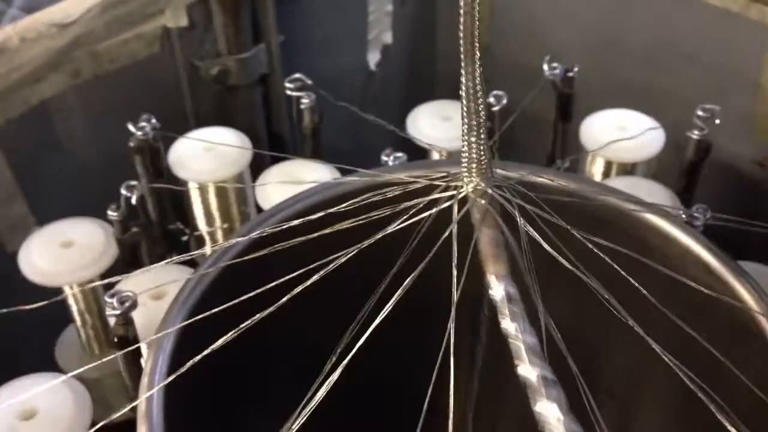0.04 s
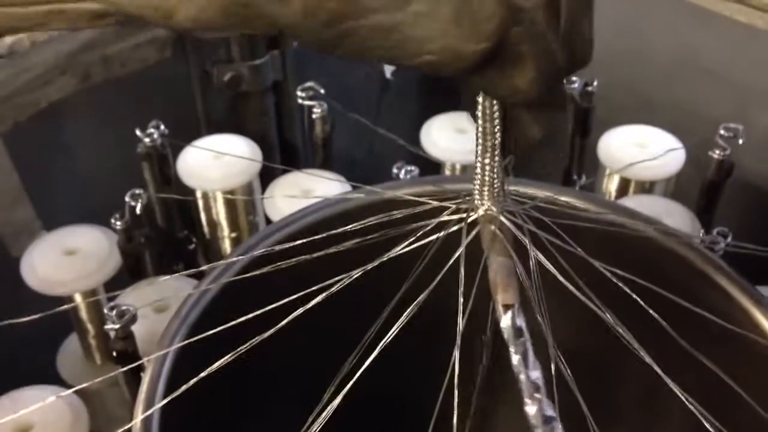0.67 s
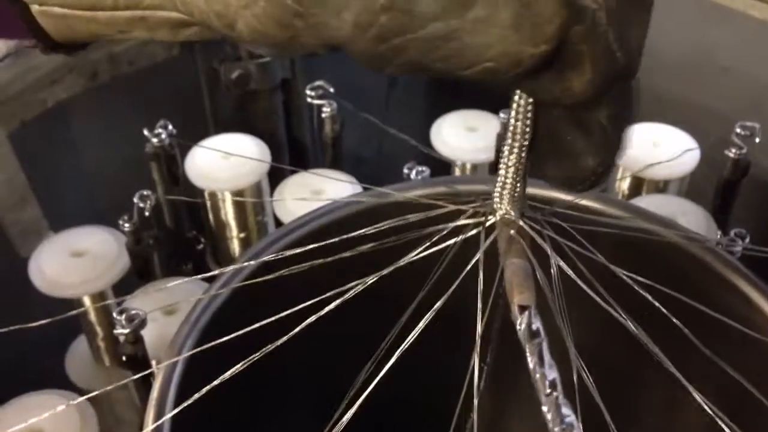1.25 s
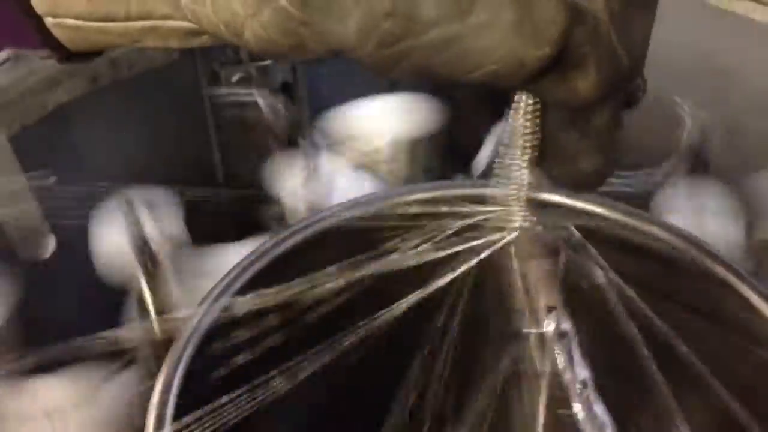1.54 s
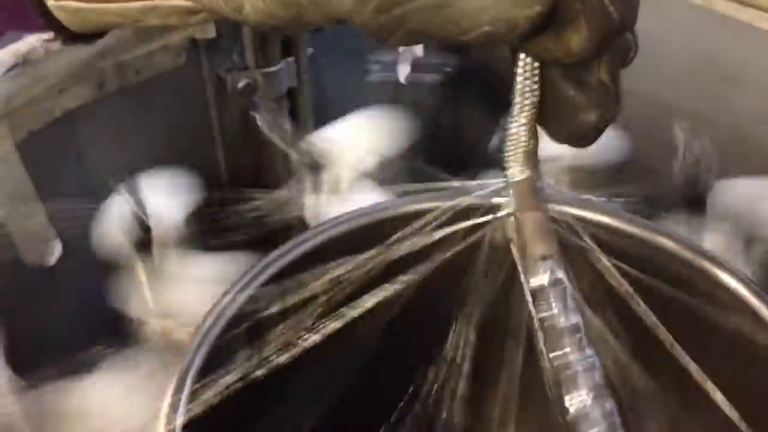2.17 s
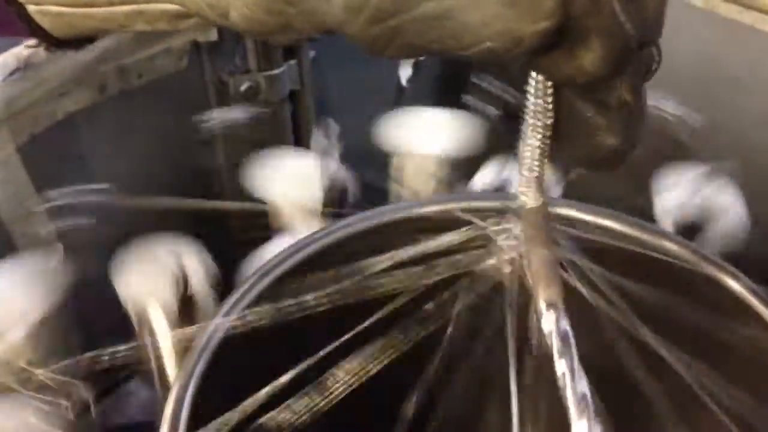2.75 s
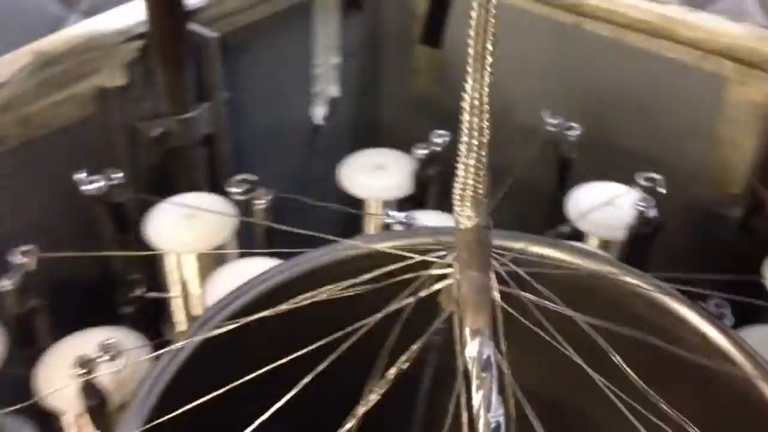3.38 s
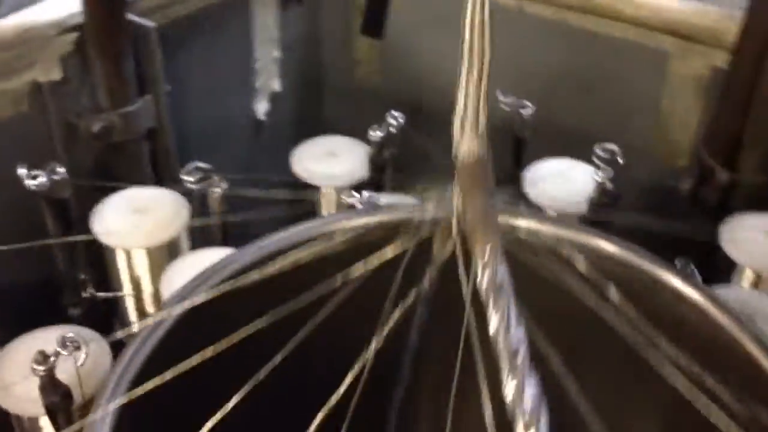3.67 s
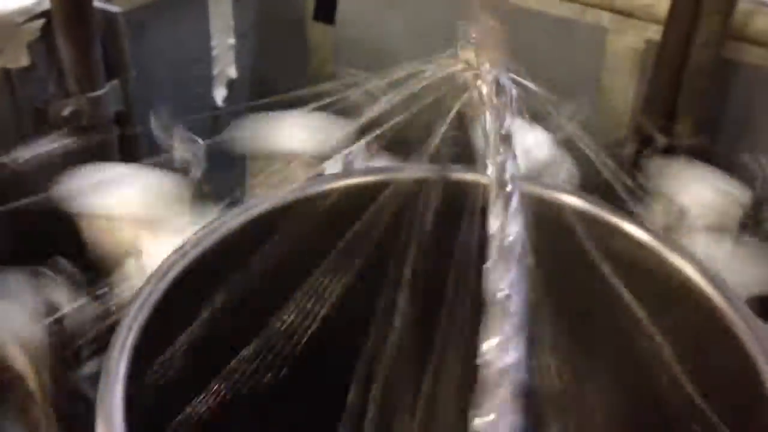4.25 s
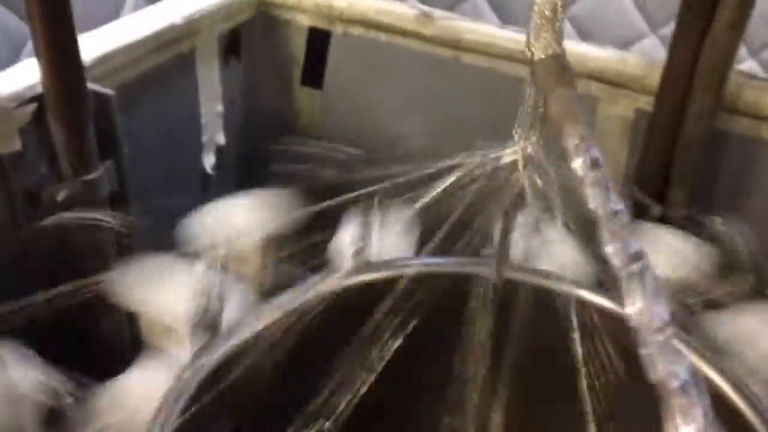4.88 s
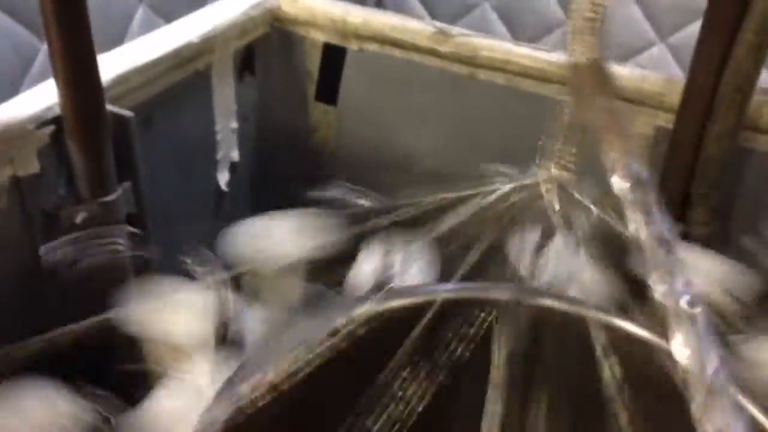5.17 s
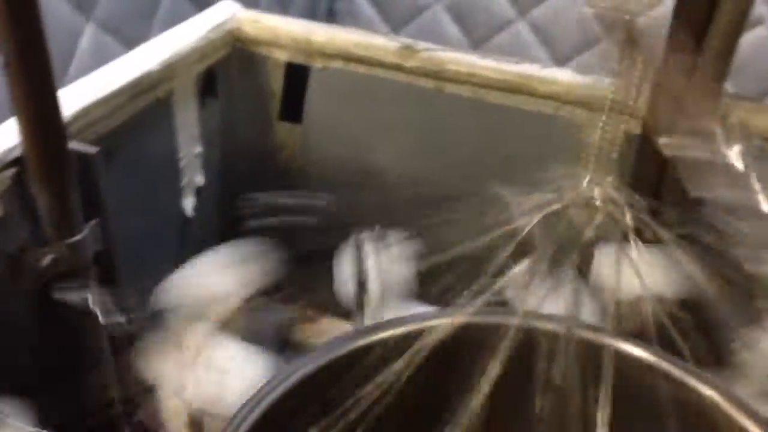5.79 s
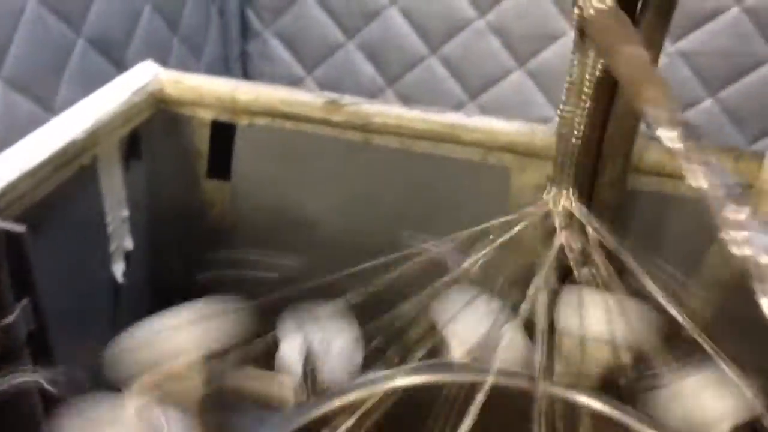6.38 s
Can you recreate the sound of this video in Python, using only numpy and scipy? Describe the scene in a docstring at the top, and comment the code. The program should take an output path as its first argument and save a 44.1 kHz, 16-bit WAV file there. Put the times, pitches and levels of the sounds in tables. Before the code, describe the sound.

Rapid steel rattling from a wire braider that starts, winds down, pauses with a ping and small scrapes, and restarts with a high ring.

```python
"""A workshop, just above the deck of a wire braiding machine that starts, runs, coasts to a halt
and starts again. Steel bobbin carriers collide in the horn gears forty times a second and rattle in
their tracks; the impacts excite the resonances of the deck and the guide ring. In the pauses a
tension lever pings once and handled wire scrapes and squeals by friction. Behind it all are a thin,
far squeak, motor hum and the noise of the shop."""
import sys
import numpy as np
from scipy import signal
from scipy.fft import rfft, irfft
from scipy.io import wavfile
from scipy.ndimage import uniform_filter1d

SR = 44100
rng = np.random.default_rng(int(sys.argv[2]) if len(sys.argv) > 2 else 0)


def to_wav(sig):
    """Store sig (one row per channel, or 1-D mono) as 16-bit WAV at the path in sys.argv[1].

    Samples outside -1..1 are clipped; the rate is SR.
    """
    pcm = np.clip(np.atleast_2d(sig), -1, 1) * 32767
    pcm = np.round(pcm).astype(np.int16)
    wavfile.write(sys.argv[1], SR, pcm.T)  # frames by channels


N = 292383
T = np.arange(N) / SR


# how hard the machine works: (time [s], clatter at full speed [dB], guide ring over clatter [dB])
WORKLOAD = [(1.37, -15, -17), (1.8, -14.5, -19), (1.89, -18, -15), (2.08, -13.5, -18), (2.65, -18.5, -17),
            (4.0, -13, -11.5), (4.17, -15.5, -11.5), (4.45, -15, -13.5), (4.65, -16.5, -7),
            (4.96, -16.5, -7.5), (5.07, -17.5, -16), (5.25, -16.5, -10), (5.58, -15, -10.5),
            (6.63, -15.5, -14.5)]
# the hardest slams of carriers in their tracks: (time [s], peak level [dB])
CARRIER_SLAMS = [(1.368, -7.5), (1.42, -13), (1.484, -6), (1.556, -15), (1.705, -8.5), (1.836, -8),
                 (2.234, -13), (2.392, -9), (2.462, -12), (2.61, -8.5), (2.779, -22), (2.834, -27),
                 (2.915, -24.5), (3.986, -16), (4.454, -13.5), (4.532, -18), (4.902, -25), (5.36, -17),
                 (5.66, -28), (6.295, -12)]
# spectral envelope of the clatter: (frequency [Hz], level [dB])
STEEL_SPECTRUM = [(35, -92), (60, -49), (129, -19.5), (226, -17), (298, -13), (521, -16.5), (792, -8.5),
                  (1170, -9.5), (1830, -3), (2200, -5.5), (2360, -3.5), (2590, -4), (5710, -4), (8470, -11),
                  (15500, -28.5)]

def machine(slam_rise_s=0.0023, slam_fall_s=0.0083, tick_db=-4):
    """Impact excitation: one force envelope drives the loose parts, the deck and the guide ring."""
    force, speed = drive()
    load_db, ring_db = curves(WORKLOAD)
    slams = sum(undb(db) * burst(s, slam_rise_s, slam_fall_s) for s, db in CARRIER_SLAMS)
    running = force * undb(load_db) * np.hypot(1, speed * knocks(slam_fall_s))
    force = np.hypot(running, slams)  # independent impacts add in power
    hits = rattle(force) + undb(tick_db) * ticks(force) + deck(force) + clinks(force)
    clatter = unit(colour(hits, STEEL_SPECTRUM)) * rms(force)
    return soften(clatter, speed) + guide_ring(force * undb(ring_db))


# runs of the gears: (clutch grips [s], slack taken up [s], a gear cycle begins [s],
# coasting begins [s], standstill [s])
GEAR_RUNS = [(1.327, 1.356, 1.504, 2.65, 3.13), (3.940, 3.983, 4.098, 7.0, 7.5)]

def drive(beat_hz=39.7, slack_db=-6.5, force_power=1.34):
    """Uniform deceleration: force and speed (0-1) jump up as the clutch grips and fall in coasting."""
    force, speed = np.zeros(N), np.ones(N)
    for start, taut, first, coast, stop in GEAR_RUNS:
        pace = np.clip((stop - T) / (stop - coast), 0, 1)
        grip = (T >= start) * undb(slack_db * (T < taut))  # lighter while the gears have slack
        beats = beat_hz * (np.cumsum(pace) / SR - first)
        force += grip * pace ** force_power * handovers(beats)
        speed = np.where(T >= start, pace, speed)
    return force, speed


def handovers(beats, cycle_beats=12, peak_beat=9.6, swell_db=0.61, alternate_db=0.53, scatter_db=1.18):
    """Periodic forcing: each hand-over between horn gears jolts the carriers, every second one harder."""
    beat = np.floor(beats).astype(int)
    db = swell_db * np.cos(2 * np.pi * (beat - peak_beat) / cycle_beats)
    db += alternate_db * np.where(beat % 2, 1, -1) + scatter_db * noise()[beat]
    jolts = uniform_filter1d(1.5 + np.exp(-(beats - beat) / 0.84), size=90)  # steady push + fading jolt
    return undb(db) * jolts / np.sqrt(uniform_filter1d(jolts ** 2, size=6000))


def knocks(fall_s, rate=18, knock_db=-11):
    """Poisson process: the envelope of lighter slams, each decaying exponentially."""
    hits = np.abs(contacts(rate, spread_db=-7))
    decays = signal.lfilter([1], [1, -np.exp(-1 / (fall_s * SR))], hits)
    return undb(knock_db) * unit(uniform_filter1d(decays, size=90))


def rattle(force, carriers=8, ring_t60=0.016, passing_db=2.0):
    """Contact chatter: each carrier clicks and rings briefly as it swings near and far."""
    out = 0
    for _ in range(carriers):
        hits = contacts(rate=300, spread_db=5) * force * undb(passing_db * walk(20))
        out = out + tail(hits, ring_t60) + hits
    return unit(out) * rms(force)


def ticks(force, rate=200, low_hz=5500):
    """Brief contacts radiate high frequencies: wires and hooks flick against each other."""
    hits = tail(contacts(rate, spread_db=-0.5) * force, t60=0.016)
    return unit(butterworth(hits, 2, low_hz, "high")) * rms(force)


# deck and carrier resonances, whose balance shifts with the listening place between the runs:
# (frequency [Hz], bandwidth [Hz], gain in the first run [dB], gain in the second run [dB])
DECK_MODES = [(132, 28, 6, 4.5), (240, 45, -9, 3.5), (297, 28, 0.5, 5.5), (442, 28, 8, 6),
              (615, 39, 5, -2.5), (804, 43, -1, -3.5), (1517, 40, -8, 7), (1826, 210, -7.5, -4),
              (2110, 40, 3, 3), (3117, 93, 1.5, 1.5), (3298, 41, 7.5, 2), (3576, 52, -1.5, -0.5),
              (4445, 69, 5, 3.5), (5200, 60, -1.5, 1.5), (5500, 34, 1.5, 1.5), (5730, 115, 3, 2),
              (6170, 60, 4, 1), (8280, 53, 7.5, 8.5)]

def deck(force, rate=110, spread_db=2.5):
    """Modal response: each resonance is struck separately as carriers knock on its part of the deck."""
    restarted = T >= GEAR_RUNS[1][0]
    out = 0
    for hz, width, first_db, second_db in DECK_MODES:
        gain = undb(np.where(restarted, second_db, first_db))
        out = out + band(force * contacts(rate, spread_db) * gain, hz, width)
    return out


def clinks(force, count=2000, low_hz=1700, high_hz=6800, t60=.035, share_db=-12):
    """Free vibration: springs, hooks and pawls ring as damped sinusoids, each at its own pitch."""
    age = T[:1400]
    out, fade = np.zeros(N + len(age)), decay(age, t60)
    for when, pitch, size in rng.random((count, 3)):
        i, hz = int(when * N), low_hz + (high_hz - low_hz) * pitch
        out[i:i + len(age)] += force[i] * (.5 + size) * np.sin(2 * np.pi * hz * age) * fade
    return undb(share_db) * unit(out[:N]) * rms(force)


def soften(clatter, speed, boom_hz=900, fine_hz=8000):
    """Spectral tilt: as the gears slow, the softer blows are boomier and lose their top."""
    speed = np.maximum(speed, .1)
    boom, boom_gain = butterworth(clatter, 1, boom_hz, "low"), undb(1.5) * speed ** -0.56
    fine, fine_gain = butterworth(clatter, 1, fine_hz, "high"), undb(-1) * speed
    return clatter + boom * (boom_gain - 1) + fine * (fine_gain - 1)


def guide_ring(force, hz=2376, width_hz=28, bite=0.7, flutter_db=2.5, stutter_db=1.0):
    """Phase diffusion: repeated blows blur the steel ring's note, and the hardest ring it most."""
    phase = np.cumsum(2 * np.pi * hz / SR + np.sqrt(2 * np.pi * width_hz / SR) * noise())
    blow, mean = (np.abs(uniform_filter1d(force, size=n)) + 1e-9 for n in (250, 3500))
    flutter = undb(flutter_db * walk(140) + stutter_db * walk(28))
    return blow * (blow / mean) ** bite * unit(np.sin(phase) * flutter)


# the clutch engaging: (time [s], crack level [dB], thump level [dB])
CLUTCH_GRIPS = [(1.327, -22, -22), (3.943, -31, -28.5)]

def clutch(thump_hz=290):
    """Shock excitation: the drive grips with a broadband crack, then a thump of the frame."""
    crack, thump = unit(colour(noise(), STEEL_SPECTRUM)), steep_band(noise(), thump_hz, 330)
    return sum(undb(crack_db) * crack * burst(s, rise=0.00046, fall=0.028)
               + undb(thump_db) * thump * burst(s + 0.0042, rise=0.0022, fall=0.025)
               for s, crack_db, thump_db in CLUTCH_GRIPS)


# modes of the tension lever: (frequency [Hz], relative level [dB], 60 dB decay time [s])
LEVER_MODES = [(2160, -7, .2), (2280, -4, 0.19), (3180, -2, 0.12), (5000, -4, .15), (5430, 3, 0.14),
               (5840, -2, .11)]

def lever(snap_s=3.1423, level_db=-20.5, modes_db=-15):
    """Modal decay: a tension lever snaps back with a crack and its modes ring on."""
    age = np.maximum(T - snap_s, 0)
    modes = sum(undb(db + 2 * walk(110)) * np.sin(2 * np.pi * hz * age) * decay(age, t60)
                for hz, db, t60 in LEVER_MODES)
    spectrum = [(300, -12), (1400, -7), (2200, 0), (3800, 0.5), (5500, 1), (7500, -7), (15000, -19)]
    crack = unit(colour(noise(), spectrum)) * burst(snap_s, rise=.0008, fall=0.0078)
    return undb(level_db) * (crack + undb(modes_db) * modes)


# bobbins nudged and wire dragged by hand: (peak time [s], level [dB], rise [s], fall [s], centre [Hz])
WIRE_SCRAPES = [(.06, -46, .02, .03, 2100), (.61, -44, .01, 0.021, 2200), (.78, -49, .02, .03, 2000),
                (.915, -45, 0.011, 0.018, 2200), (1.02, -46, .02, .03, 2200),
                (1.281, -41, 0.014, 0.044, 2500), (3.243, -41.5, .003, .015, 4500),
                (3.43, -46, .015, .015, 600), (3.633, -30.5, 0.013, 0.026, 2300),
                (3.792, -36.5, 0.018, 0.01, 1700)]

def wire_scrapes(grain_t60=0.01):
    """Sliding friction: dense tiny impacts merge into gritty bursts."""
    grains = tail(contacts(rate=2000, spread_db=3), grain_t60)
    spectrum = [(200, -7), (800, 21), (1800, 15), (2800, 13.5), (5000, 12), (9000, -6), (15000, -14)]
    grit = colour(grains, spectrum)
    return sum(undb(db) * burst(s, rise, fall) * unit(band(grit, hz, 2 * hz))
               for s, db, rise, fall, hz in WIRE_SCRAPES)


# squeals of taut wire: (peak time [s], duration [s], frequency [Hz], level [dB])
WIRE_SQUEALS = [(0.923, 0.016, 1045, -39.5), (0.61, 0.04, 5500, -52), (.85, .1, 5450, -56),
                (1.28, 0.015, 1100, -39), (1.283, 0.0086, 4370, -41), (3.795, .025, 4800, -47)]

def wire_squeals(waver=0.0042):
    """Friction-excited vibration: taut wire gives brief tones of slightly wavering pitch."""
    warped_time = np.cumsum(1 + waver * walk(200)) / SR
    return sum(undb(db) * swell(s, length) * unit(np.sin(2 * np.pi * hz * warped_time))
               for s, length, hz, db in WIRE_SQUEALS)


def far_squeak(first_s=.05, turn_s=.138, length_s=0.08, hz=9300, start_db=-51, fade_db_per_s=-2.2):
    """Periodic friction: a far part whistles and rubs once a turn, varying in pitch and strength."""
    times = np.arange(first_s, T[-1], turn_s)
    air, out = noise(), np.zeros(N)
    rub = steep_band(noise(), hz=7500, width=7000)
    for s, (pitch, size) in zip(times, rng.standard_normal((len(times), 2))):
        near = np.abs(T - s) < turn_s
        whistle = steep_band(air[near], hz + 300 * pitch, width=450)
        gain = undb(start_db + fade_db_per_s * s + 2.5 * size)
        out[near] += gain * swell(s, length_s)[near] * (whistle + rub[near])
    return out


# spectral envelope of the shop noise: (frequency [Hz], level [dB])
SHOP_SPECTRUM = [(15, -32), (25, -35), (52, -21), (129, -5.5), (246, -5.5), (359, -11), (389, -13.5),
                 (469, -12.5), (523, -12.5), (1050, -14), (1300, -11.5), (1800, -12.5), (4380, -15),
                 (9300, -30), (15500, -41)]
# the background rumble and hiss are a little fainter after the first run:
# (time [s], rumble [dB], hiss [dB], top hiss [dB])
BACKGROUND_LEVELS = [(1.3, -43, -45.5, -50.5), (3.2, -45.5, -47, -53.5)]

def workshop(flicker_db=-0.27, tinkle_db=-5):
    """Incoherent sources: machines further off blend into rumble, hiss and a light tinkle."""
    rumble_db, hiss_db, top_db = curves(BACKGROUND_LEVELS)
    edges = [(900, "low"), ([900, 6000], "band"), (6000, "high")]
    low, middle, top = (unit(butterworth(colour(noise(), SHOP_SPECTRUM), 4, hz, kind))
                        for hz, kind in edges)
    tinkle = steep_band(tail(contacts(rate=83, spread_db=4.5), t60=0.082), hz=2080, width=650)
    hiss = (middle + undb(tinkle_db) * tinkle) * undb(hiss_db) + top * undb(top_db)
    return low * undb(rumble_db) + hiss * undb(flicker_db * walk(38))


# bands of the motor hum: (frequency [Hz], bandwidth [Hz], relative level [dB])
HUM_BANDS = [(62.3, 13, -2.5), (136.5, 15, -3)]
# the hum is strongest just before the first start: (time [s], level [dB])
HUM_LEVEL = [(0, -52), (1.3, -44), (1.9, -69), (3.3, -58), (4.0, -61)]

def motor_hum():
    """Narrowband noise: two low bands make an unsteady drone."""
    hum = sum(undb(db) * steep_band(noise(), hz, width) for hz, width, db in HUM_BANDS)
    return hum * undb(curves(HUM_LEVEL)[0])


def undb(db):
    """Decibels to amplitude ratio."""
    return 10 ** (np.asarray(db) / 20)


def rms(x):
    """Root-mean-square amplitude, kept above zero."""
    return np.sqrt(np.mean(x ** 2) + 1e-18)


def unit(x):
    """Normalisation to rms 1."""
    return x / rms(x)


def noise():
    """Gaussian white noise."""
    return rng.standard_normal(N)


def curves(rows):
    """Linear interpolation of each table column in time."""
    s, *columns = np.transpose(rows)
    return [np.interp(T, s, c) for c in columns]


def walk(rate):
    """Random modulation: levels held for 1 / rate seconds and smoothed, at rms 1."""
    hold = max(int(SR / rate), 2)
    steps = np.repeat(noise()[:N // hold + 1], hold)
    return unit(uniform_filter1d(uniform_filter1d(steps, hold), hold // 2)[:N])


def contacts(rate, spread_db):
    """Poisson impacts, on average `rate` a second, of uneven size and either sign."""
    chance = rng.random(N)
    hit, out = chance < rate / SR, np.zeros(N)
    out[hit] = np.sign(chance[hit] - rate / SR / 2) * undb(spread_db * np.clip(noise()[hit], -2, 2))
    return unit(out)


def burst(s, rise, fall):
    """Exponential rise to 1 at time s, then exponential fall; time constants in seconds."""
    return np.exp(-np.minimum(np.maximum((s - T) / rise, (T - s) / fall), 20))


def swell(s, length):
    """Gaussian envelope around time s."""
    return np.exp(-np.minimum((2 * (T - s) / length) ** 2, 20))


def decay(age, t60):
    """Exponential damping by 60 dB in t60 seconds."""
    return np.exp(-np.log(1000) * age / t60)


def band(x, hz, width):
    """Second-order resonance, gain 1 at its centre."""
    return signal.lfilter(*signal.iirpeak(min(hz, SR / 2 - 500), hz / width, fs=SR), x)


def steep_band(x, hz, width):
    """Two equal resonances in cascade, scaled to rms 1."""
    return unit(band(band(x, hz, width), hz, width))


def butterworth(x, order, hz, kind):
    """Filter with a maximally flat passband."""
    return signal.sosfilt(signal.butter(order, hz, kind, fs=SR, output="sos"), x)


def colour(x, points, size=4096):
    """Minimum-phase filter through the points (frequency [Hz], gain [dB])."""
    hz, db = np.transpose(points)
    bin_hz = np.arange(size // 2 + 1) * SR / size
    log_gain = np.log(undb(np.interp(np.log(bin_hz + 1), np.log(hz), db)))
    cepstrum = irfft(log_gain)[:size // 2]
    cepstrum[1:] *= 2  # folding makes the response causal
    return signal.fftconvolve(x, irfft(np.exp(rfft(cepstrum, size))))[:N]


def tail(x, t60):
    """Diffuse decay of many modes or reflections, at unchanged power."""
    age = T[:int(t60 * SR) + 2]
    response = rng.standard_normal(SR)[:len(age)] * decay(age, t60)
    return signal.oaconvolve(x, response / np.linalg.norm(response))[:N]


def scene(reverb_db=-9.5):
    """Superposition: direct sound, its short reverberation in a padded enclosure, and the background."""
    near = machine() + clutch() + lever() + wire_scrapes() + wire_squeals()
    reverb = undb(reverb_db) * tail(near, t60=0.22)
    return (near + reverb + workshop() + motor_hum() + far_squeak())[None]


def record(dry, ceiling=0.54, top_hz=15500):
    """Soft saturation: the tallest peaks are rounded off, and a steep low-pass cuts the top."""
    rounded = ceiling * np.tanh(dry / ceiling)
    return signal.sosfilt(signal.ellip(10, .2, 80, top_hz, fs=SR, output="sos"), rounded)


dry = scene()
out = record(dry)
to_wav(out)
```